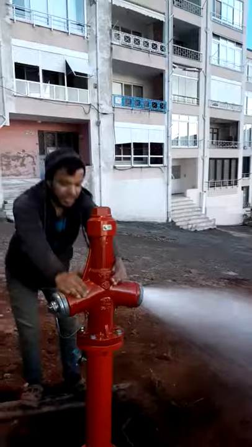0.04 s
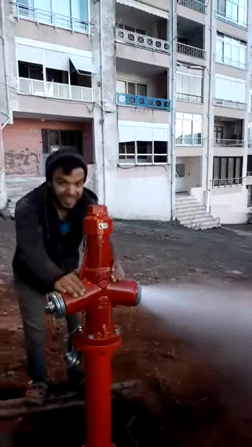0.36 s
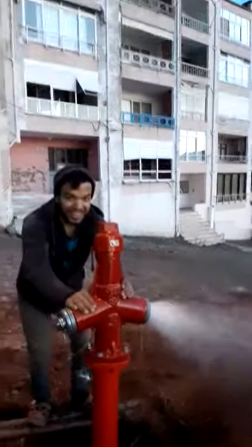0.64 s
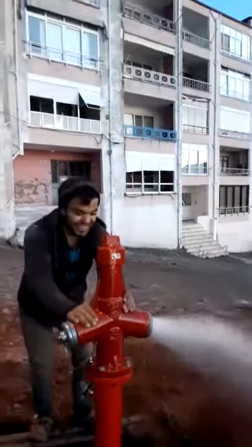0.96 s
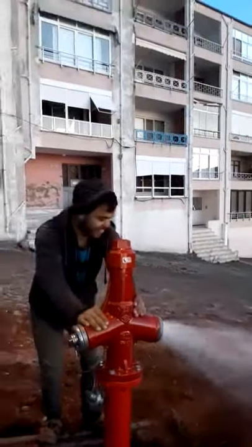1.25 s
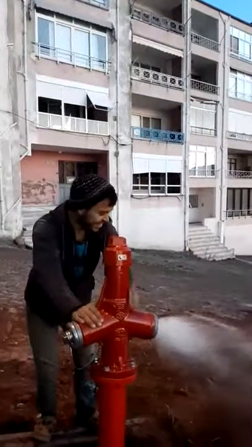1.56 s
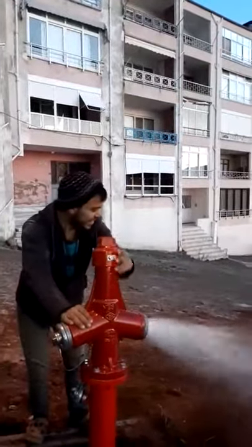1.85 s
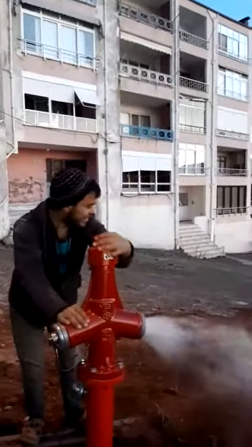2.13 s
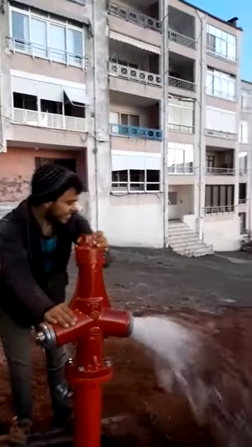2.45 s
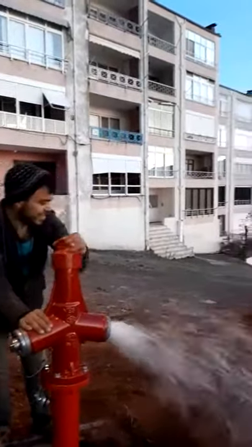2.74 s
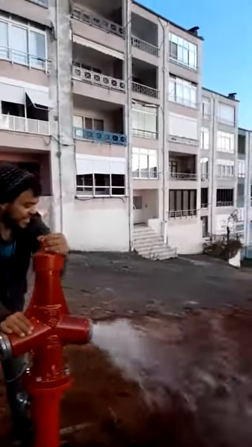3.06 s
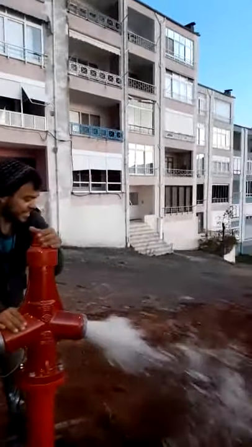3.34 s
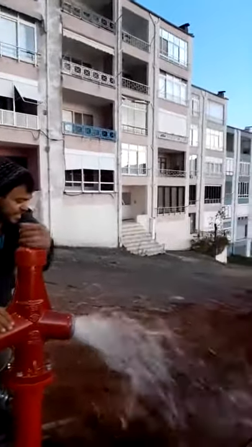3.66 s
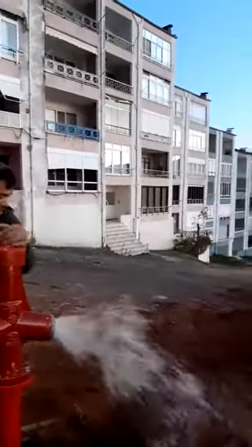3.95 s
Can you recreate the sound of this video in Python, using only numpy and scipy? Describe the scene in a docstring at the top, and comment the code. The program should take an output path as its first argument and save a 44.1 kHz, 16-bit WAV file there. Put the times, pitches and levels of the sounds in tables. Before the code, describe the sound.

Close to the microphone outdoors, a hydrant jet bursts out, rushing and hissing over churning air. About halfway through it chokes and coughs out bubbly, uneven spurts that slap onto wet ground in showers of drops.

```python
"""A hydrant jet blasts water and trapped air from a side outlet onto muddy ground, close to a phone.
It roars in surges over the rumble of air churning in the barrel, then breaks into gurgling spurts.
Spray hisses throughout, and slugs of water slap down in showers of drops; a house front echoes faintly."""
import sys
import numpy as np
from scipy import signal
from scipy.fft import rfft, irfft
from scipy.io import wavfile
from scipy.ndimage import uniform_filter1d

SR = 44100
rng = np.random.default_rng(int(sys.argv[2]) if len(sys.argv) > 2 else 0)


def wav_out(sig):
    """Save sig, one row per channel (or a flat mono array), as 16-bit PCM at SR to the path in sys.argv[1]."""
    wavfile.write(sys.argv[1], SR, np.round(np.clip(np.atleast_2d(sig).T, -1, 1) * 32767).astype(np.int16))


N = 176400
TIME_S = np.arange(N) / SR
BIN_HZ = np.arange(N // 2 + 1) * SR / N + 1  # offset by 1 Hz to keep the log finite


def undb(db):
    """Decibels to gain."""
    return 10 ** (np.asarray(db) / 20)


def unit(x):
    """Scale to rms 1."""
    return x / np.sqrt(np.mean(x ** 2) + 1e-18)


def curve(rows, column=1):
    """An envelope: one table column joined by straight lines in time."""
    rows = np.array(rows)
    return np.interp(TIME_S, rows[:, 0], rows[:, column])


def swells(rows, column):
    """Power envelope of bell-shaped bursts; rows begin with peak_s, width_s."""
    return sum(undb(row[column]) ** 2 * np.exp(-.5 * ((TIME_S - row[0]) / row[1]) ** 2) for row in rows)


def per_bin(points, column=1):
    """One table column drawn over a log-frequency axis."""
    points = np.array(points)
    return np.interp(np.log(BIN_HZ), np.log(points[:, 0]), points[:, column])


def colour(x, points, skirt_db=30):
    """Minimum-phase EQ through freq_hz, gain_db points, falling skirt_db an octave outside them."""
    octaves_outside = np.maximum(0, np.maximum(np.log2(points[0][0] / BIN_HZ),
                                               np.log2(BIN_HZ / points[-1][0])))
    gain_db = per_bin(points) - np.minimum(skirt_db * octaves_outside, 70)
    cepstrum = irfft(np.log(undb(gain_db)), N)
    cepstrum[1:N // 2] *= 2
    cepstrum[N // 2 + 1:] = 0
    return irfft(rfft(x) * np.exp(rfft(cepstrum)), N)


def wobble(rate_hz):
    """A smooth random modulator with rms 1."""
    hold = max(int(SR / rate_hz), 2)
    steps = np.repeat(rng.standard_normal(N // hold + 2), hold)
    return unit(uniform_filter1d(steps, hold)[rng.integers(hold):][:N])


def flicker(x, rate_hz, depth_db, bands=12):
    """Each half octave from 400 Hz up swells and fades on its own."""
    band = np.clip(2 * np.log2(BIN_HZ / 400), 0, bands - 1)
    spectrum = rfft(x)
    layers = (irfft(spectrum * np.maximum(0, 1 - abs(band - k)), N) for k in range(bands))
    return sum(layer * undb(depth_db * wobble(rate_hz)) for layer in layers)


def add(out, start_s, sound):
    """Mix a sound in at a time."""
    i = int(start_s * SR)
    out[..., i:i + sound.shape[-1]] += sound[..., :N - i]


def noise():
    """Two channels of white noise."""
    return rng.standard_normal((2, N))


def drops(per_s, scatter_db):
    """Drops strike at random, mostly small and a few large."""
    size = undb(scatter_db * np.minimum(rng.exponential(size=N), 5))
    return unit((rng.random(N) < per_s / SR) * size * noise())


def lumps(per_s, decay_s, range_db):
    """Lumps of water of all sizes: noise bursts with a sharp attack and a quick decay."""
    age = np.arange(N // 100) / SR
    hits = (rng.random(N) < per_s / SR) * undb(range_db * rng.random(N)) ** 2
    power = signal.fftconvolve(hits, np.exp(-age / decay_s))[:N]
    return unit(np.sqrt(np.abs(power)) * noise())


def ring(pitch_hz, decay_s, rise):
    """One bubble: a damped tone that glides up."""
    length_s = 6 * decay_s
    age = np.arange(int(length_s * SR) + 2) / SR
    return np.sin(2 * np.pi * pitch_hz * age * (1 + rise * age / length_s)) * np.exp(-age / decay_s)


def bubbles(count, low_hz, high_hz, cycles, scatter_db):
    """A cloud of bubbles of all sizes, each decaying over roughly the given number of cycles."""
    out = np.zeros((2, N))
    for when, pitch, size, life, angle in rng.random((count, 5)):
        hz = low_hz * (high_hz / low_hz) ** pitch
        strength = undb(-scatter_db * np.log(size + 0.068)) * hz / low_hz
        pan = np.array([[np.cos(2 * np.pi * angle)], [np.sin(2 * np.pi * angle)]])
        add(out, when * N / SR, strength * pan * ring(hz, cycles * (.5 + life) / hz, rise=0.072))
    return unit(out)


# Stereo image at the two microphone ports: freq_hz, coherence, left_lead_rad, left_over_right_db
STEREO_IMAGE = [(305, .999, -0.02, 0), (426, 0.97, -0.4, -3), (555, 0.15, -0.1, 5), (660, 0.99, -1.4, 3.5),
                (800, 0.88, -0.2, 1.5), (990, 1, -0.82, 0.5), (1240, 0.98, -1.3, 3),
                (1420, 0.52, -2.25, -4.5), (1510, 0.71, 1, 1.2), (1964, 0.2, -2.36, -3.5),
                (2590, 0.95, 0.8, -1.5), (3300, 0.17, 1.2, 1), (4400, 0.75, 2, 2), (5300, 0.45, 2, 4.5),
                (6400, 0.25, -1.3, 6), (7400, 0.092, -0.5, -.5), (15000, 0.089, -2, 2)]


def spread(pair):
    """Two unrelated signals reach the two ports, alike in the bass; their mean has rms 1."""
    coherence = np.clip(per_bin(STEREO_IMAGE, column=1), 0, .9995)
    lead, lean_db = per_bin(STEREO_IMAGE, column=2), per_bin(STEREO_IMAGE, column=3)
    weights = np.sqrt([1 + coherence, 1 - coherence]) / np.sqrt(1 + coherence * np.cos(lead))
    mid, side = rfft(pair) * weights
    turn = undb(lean_db / 2) * np.exp(.5j * lead)
    out = irfft(np.array([(mid + side) * turn, (mid - side) / turn]), N)
    return out / np.std(out.mean(axis=0))


def yard(x, echo_s=0.078, echo_db=-20.5, t60_s=0.19, tail_db=-15):
    """A faint slapback from the house front and a short scattered tail without bass."""
    age = np.arange(N // 4) / SR
    tail = rng.standard_normal((2, len(age))) * np.exp(-np.log(1000) * age / t60_s)
    tail = signal.sosfilt(signal.butter(2, 600, "high", fs=SR, output="sos"), tail)
    tail *= undb(tail_db) / np.sqrt(np.sum(tail[0] ** 2))
    tail[:, int(echo_s * SR)] += undb(echo_db)
    return x + signal.fftconvolve(x, tail, axes=1)[:, :N]


# Airy hiss of the mist: freq_hz, gain_db
MIST_EQ = [(2500, -8), (4000, -6), (4700, -1.5), (5400, 0), (6000, 3), (6600, 6.5), (7300, 1), (8000, -6),
           (8800, -2.5), (10000, -4), (12500, -3.5), (14500, -3.5), (15800, -3.5)]
# Rise and fall of the spray: time_s, level_db
SPRAY_LEVEL = [(.38, -47.5), (.47, -37.5), (.56, -33.5), (.7, -32.5), (.87, -36), (.96, -32), (1.12, -32),
               (1.31, -34.5), (1.44, -34), (1.49, -31), (1.55, -38), (1.72, -35), (1.98, -38), (2.08, -33),
               (2.2, -38), (2.31, -41), (2.52, -38), (2.6, -44), (2.65, -38), (3.5, -38.5), (3.55, -42),
               (3.63, -38), (4.0, -37)]


def spray():
    """Fine mist hisses around the jet."""
    mist = noise() + undb(-0.5) * drops(per_s=5000, scatter_db=3.4)
    hiss = colour(mist, MIST_EQ, skirt_db=15) * undb(1.07 * wobble(40.67))
    return spread(hiss) * undb(curve(SPRAY_LEVEL))


# Bright, wet tone of water on mud: freq_hz, gain_db
MUD_EQ = [(500, -2), (1500, 1), (3000, 0), (3550, 5), (4130, 9.5), (5200, -1.5), (6200, 1.5), (7100, 8),
          (8500, 0.5), (10000, 0.5), (12000, -4.5), (15800, -1.5)]
# Bed of patter: time_s, gain_db
PATTER_LEVEL = [(.38, -52), (.7, -39), (1.46, -38.5), (1.535, -42), (1.65, -38.5), (2.1, -37.5),
                (2.32, -40), (2.6, -41), (2.66, -36.5), (2.9, -34.5), (3.3, -37), (3.55, -41), (3.7, -37.5),
                (4.0, -35)]
# Splashes that swell out of the bed: peak_s, width_s, gain_db
MUD_SPLASHES = [(2.468, 0.014, -32), (2.522, 0.012, -38), (2.712, 0.024, -32.5), (2.84, 0.011, -37),
                (2.92, 0.065, -39.5), (3.04, 0.053, -36.5), (3.22, 0.04, -36), (3.33, 0.027, -35.5),
                (3.455, 0.038, -33.5), (3.648, 0.027, -33), (3.76, 0.012, -34.5), (3.874, 0.026, -30.5),
                (3.96, 0.015, -33)]


def ground():
    """Lumps of water hit the mud and scatter into drops and tiny bubbles."""
    water = undb(1) * lumps(per_s=185, decay_s=0.0026, range_db=9.5)
    water += undb(-1) * drops(per_s=6000, scatter_db=2.7)
    water += undb(-7) * bubbles(3000, low_hz=2012, high_hz=11100, cycles=20.3, scatter_db=5.7)
    patter = flicker(colour(water, MUD_EQ, skirt_db=18), rate_hz=55, depth_db=2.4)
    power = undb(curve(PATTER_LEVEL)) ** 2 + swells(MUD_SPLASHES, column=2)
    return spread(patter) * np.sqrt(power) * undb(1.5)


# Hard single hits on the mud: start_s, gain_db
MUD_SLAPS = [(1.931, -33), (2.364, -29.5), (2.471, -29), (2.518, -27), (2.621, -28.5), (2.836, -27),
             (2.894, -30), (3.36, -26.5), (3.483, -26.5), (3.639, -27), (3.658, -31), (3.679, -28),
             (3.862, -26), (3.959, -25)]


def slaps(decay_s=0.0076):
    """The biggest lumps land with a short smack, each with its own colour."""
    smack = spread(flicker(colour(noise(), MUD_EQ), rate_hz=150, depth_db=4))
    envelope = sum(undb(db) * (TIME_S > start_s) * np.exp(-np.abs(TIME_S - start_s) / decay_s)
                   for start_s, db in MUD_SLAPS)
    return smack * envelope * undb(2)


# Low-end weight of the pipe: freq_hz, gain_db
PIPE_EQ = [(30, -25), (60, -12), (85, -18), (115, 0.5), (160, -0.5), (220, -15.5)]
# Shudders: peak_s, width_s, level_db
PIPE_SHUDDERS = [(.60, 0.032, -36.5), (.775, 0.069, -36.5), (1.06, 0.026, -39), (1.755, 0.033, -37.5)]


def shudder():
    """The pipe shudders deeply at the hardest surges."""
    throb = colour(noise(), PIPE_EQ) * undb(2 * wobble(70))
    return spread(throb) * np.sqrt(swells(PIPE_SHUDDERS, column=2))


# Clear plops on top of the gurgle, plus two high plinks of landing drops at 3.678 s and 3.958 s: start_s,
# pitch_hz, level_db
PLOPS = [(2.391, 733, -21), (2.412, 960, -25), (2.457, 979, -21), (2.565, 1120, -25), (2.772, 2400, -30),
         (2.788, 820, -24), (2.822, 1250, -22), (3.033, 805, -29), (3.296, 1880, -25), (3.353, 910, -23),
         (3.397, 970, -21), (3.408, 1480, -22), (3.516, 954, -24), (3.678, 2950, -25), (3.735, 1270, -25),
         (3.778, 820, -22), (3.891, 2400, -23), (3.958, 3750, -25), (3.975, 950, -25)]


def glugs():
    """The loudest bubbles pop one by one, and two drops land with a high plink; each rings briefly with a
    rising pitch."""
    out = np.zeros(N)
    for start_s, pitch_hz, level_db in PLOPS:
        add(out, start_s, undb(level_db) * ring(pitch_hz, decay_s=0.0069, rise=.02))
    return out


# Throaty midrange of the gurgle: freq_hz, gain_db
GURGLE_EQ = [(290, -40), (500, -18), (571, -29), (605, -5), (635, -4), (737, -7), (807, 2), (944, 2),
             (1040, -3.5), (1280, -1.5), (1380, -8), (1540, -1), (1670, -8.5), (2400, -4.5), (3000, -9.5),
             (3340, -8), (3600, -9), (4680, -38), (7920, -120)]
# Weak flow between spurts, also driving the barrel: time_s, rumble_gain_db, roar_gain_db
WEAK_FLOW = [(1.93, -40, -41), (2.03, -41, -32.5), (2.22, -41, -42), (2.31, -45.5, -45), (2.37, -46, -43),
             (2.43, -42, -36.5), (3.1, -44, -36.5), (4.0, -46.5, -37)]
# Coughs of air and water, also driving the barrel: peak_s, width_s, roar_gain_db, rumble_gain_db
COUGHS = [(1.99, 0.0075, -33, -37), (2.07, 0.033, -28, -38.5), (2.22, 0.039, -29, -42.5),
          (2.415, 0.014, -30.5, -37), (2.463, 0.015, -26.5, -44), (2.595, 0.023, -28, -42),
          (2.695, 0.026, -27.5, -39.5), (2.79, 0.019, -28, -36.5), (2.875, 0.024, -27, -39),
          (2.97, 0.014, -30, -42), (3.045, 0.013, -29, -41), (3.145, 0.013, -27, -38),
          (3.197, 0.0054, -26, -30), (3.24, 0.016, -29.5, -40.5), (3.335, 0.03, -32.5, -41),
          (3.408, 0.016, -26, -34.5), (3.53, 0.019, -32.5, -48), (3.573, 0.0038, -33, -44),
          (3.665, 0.06, -32.5, -45), (3.775, 0.024, -31, -39), (3.895, 0.025, -30, -44),
          (3.975, 0.018, -29.5, -43.5)]


def spurts(sputter):
    """The weakened jet coughs out slugs full of bubbles."""
    froth = undb(-2) * noise() + undb(-1.5) * lumps(per_s=160, decay_s=0.0036, range_db=13)
    froth += undb(-5.5) * bubbles(3500, low_hz=601.5, high_hz=4320, cycles=7.3, scatter_db=2.2)
    gurgle = flicker(colour(froth, GURGLE_EQ, skirt_db=21), rate_hz=70, depth_db=1.5)
    power = undb(curve(WEAK_FLOW, column=2)) ** 2 + swells(COUGHS, column=2)
    return spread(gurgle * undb(0.53 * sputter)) * np.sqrt(power) * undb(-0.97)


# Hollow body of the barrel at full and at weak flow: freq_hz, gain_db
BARREL_FULL_EQ = [(30, -21), (80, -21.5), (110, -11), (160, -1), (215, -3.5), (280, 2), (340, 2),
                  (395, -0.5), (470, -11.5), (560, -8.5)]
BARREL_WEAK_EQ = [(15, -60), (25, -39), (60, -19), (86, -28), (115, -12.5), (141, -8), (257, -1.5),
                  (277, 0.5), (304, -1), (374, 2), (449, -9.5), (560, -14), (730, -41), (1230, -120)]


def barrel(intact):
    """Air pockets churn in the barrel, deeper under full pressure."""
    churn = noise() + undb(-16) * bubbles(900, low_hz=110.1, high_hz=433, cycles=3.2, scatter_db=1.8)
    full = spread(colour(churn, BARREL_FULL_EQ) * undb(0.68 * wobble(90)))
    full *= undb(curve(JET_SURGES, column=1) - 1.24)
    weak = spread(colour(churn, BARREL_WEAK_EQ) * undb(1.4 * wobble(90)))
    weak *= np.sqrt(undb(curve(WEAK_FLOW, column=1)) ** 2 + swells(COUGHS, column=3)) * undb(2)
    return full * intact + weak * (1 - intact)


# Midrange roar of the outlet and raspy edge of the nozzle: freq_hz, gain_db
ROAR_EQ = [(500, -14), (585, -7), (640, 1.5), (730, 1), (800, 9), (870, 2.5), (960, 6.5), (1190, -1),
           (1280, 2.5), (1400, -2), (1570, 6.5), (1890, -6.5)]
RASP_EQ = [(1920, -9), (2080, 3.5), (2200, -0.5), (2420, 3.5), (2650, 2), (2850, 4), (3130, -5.5),
           (3300, -1), (3490, 4.5), (3680, -0.5), (4000, -9.5), (4600, -7.5)]
# Rasp, cut short each time the flow chokes: time_s, gain_db
RASP_LEVEL = [(.39, -47.5), (.5, -42.5), (.59, -34.5), (.648, -38), (.684, -30), (1.02, -30.5),
              (1.04, -25.5), (1.07, -31), (1.11, -27.5), (1.15, -33), (1.235, -31), (1.266, -41),
              (1.36, -37), (1.41, -29), (1.448, -26), (1.474, -39), (1.54, -44), (1.575, -32), (1.615, -27),
              (1.654, -34), (1.74, -29), (1.885, -31), (1.92, -41)]
# Surges of the full jet, also driving the barrel: time_s, rumble_gain_db, roar_gain_db
JET_SURGES = [(0.39, -50, -46), (0.406, -35, -43), (0.49, -37, -42), (0.55, -36.5, -34.5),
              (0.654, -33.5, -33), (0.68, -30, -27.5), (0.742, -22, -28), (0.764, -27.5, -30),
              (0.81, -24, -28), (0.88, -31.5, -29.5), (1.005, -31.5, -30), (1.036, -22.5, -25),
              (1.078, -32, -28), (1.105, -22.5, -25.5), (1.17, -31, -31), (1.232, -30.5, -31),
              (1.266, -33, -33.5), (1.374, -34.5, -33), (1.41, -31.5, -26.5), (1.445, -30, -26.5),
              (1.475, -39, -37.5), (1.52, -38.5, -36.5), (1.608, -33, -26.5), (1.66, -31.5, -30),
              (1.71, -28, -26.5), (1.76, -24, -25), (1.80, -30, -29.5), (1.885, -31.5, -31.5),
              (1.915, -38, -45)]


def jet(sputter):
    """The full jet tears into drops and roars; the nozzle rasps until the flow chokes."""
    tearing = noise() + undb(-7.5) * drops(per_s=3000, scatter_db=2.7)
    tearing += undb(-13) * bubbles(3000, low_hz=606, high_hz=4110, cycles=5.9, scatter_db=2.2)
    roar = spread(colour(tearing, ROAR_EQ) * undb(sputter))
    rasp = spread(colour(tearing, RASP_EQ) * undb(1.14 * sputter))
    return roar * undb(curve(JET_SURGES, column=2) - 2.34) + rasp * undb(curve(RASP_LEVEL) + 0.23)


def scene(start_s=.378, attack_s=0.013, broken_s=1.95):
    """The water bursts out of silence; the full jet later crossfades quickly into spurts."""
    sputter = wobble(90)
    intact = curve([(JET_SURGES[-1][0], 1), (broken_s, 0)])  # 1 while the jet holds together
    water = barrel(intact) + shudder() + jet(sputter) * intact + spurts(sputter) * (1 - intact)
    water += glugs() + spray() + ground() + slaps()
    return yard(water * curve([(start_s, 0), (start_s + attack_s, 1)]))


def record(dry, cutoff_hz=15900):
    """The phone cuts the top with a steep low-pass."""
    return signal.sosfilt(signal.ellip(12, .2, 80, cutoff_hz, fs=SR, output="sos"), dry)


dry = scene()
out = record(dry)
wav_out(out)
```